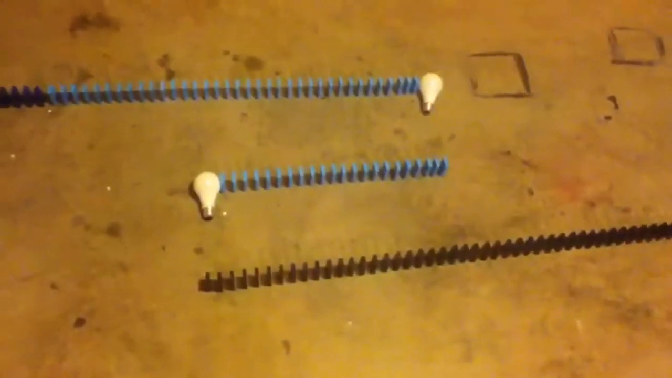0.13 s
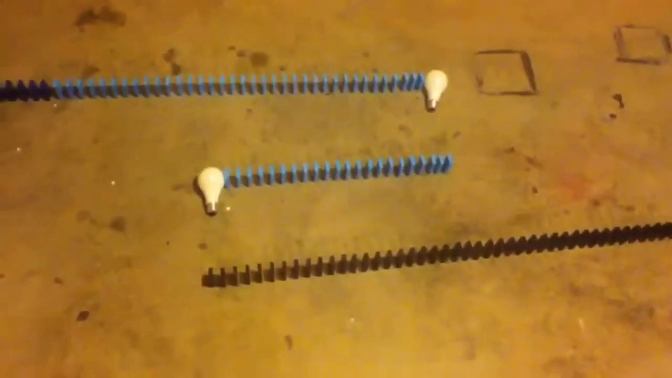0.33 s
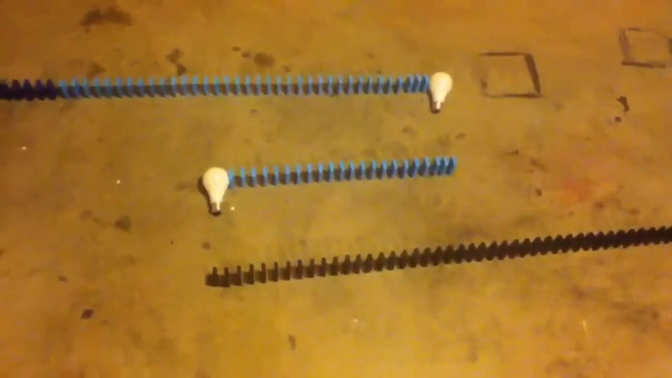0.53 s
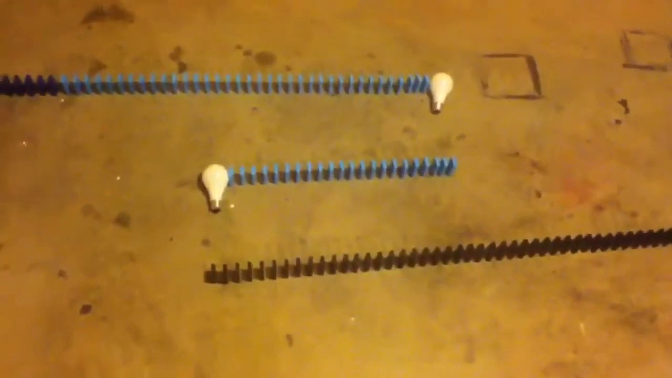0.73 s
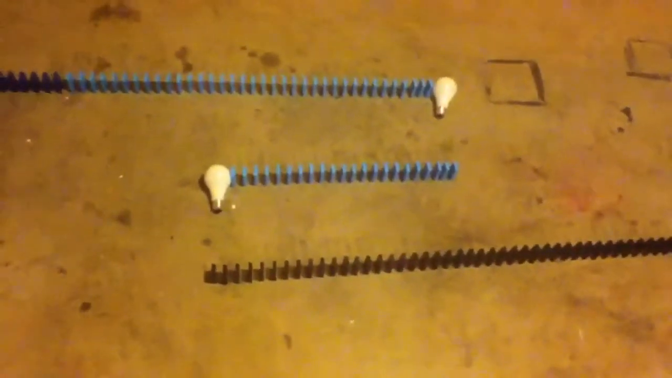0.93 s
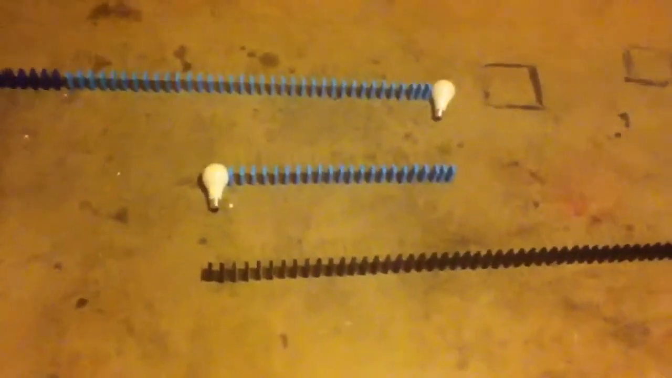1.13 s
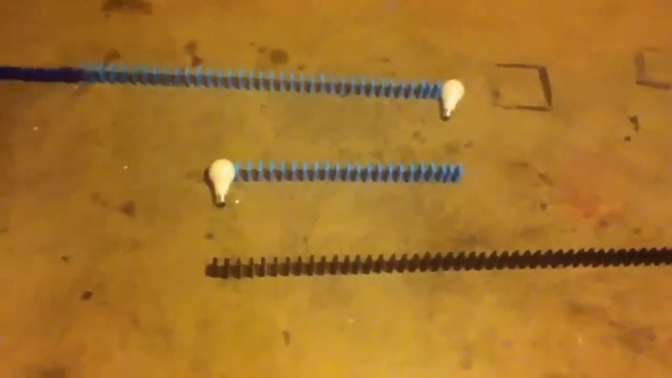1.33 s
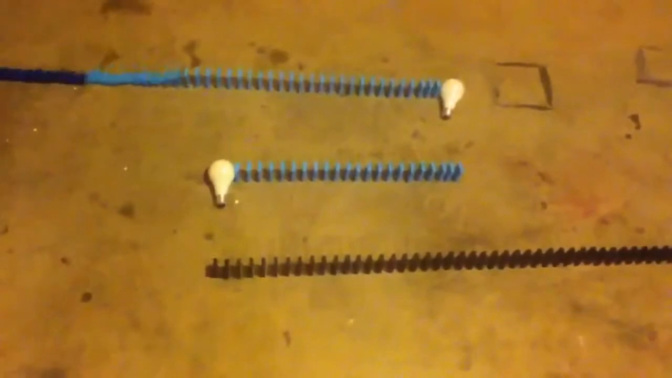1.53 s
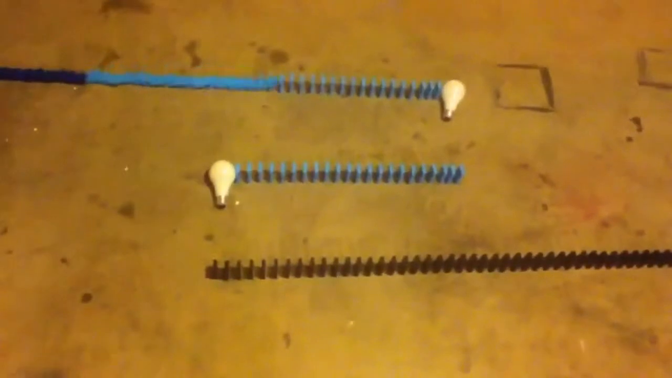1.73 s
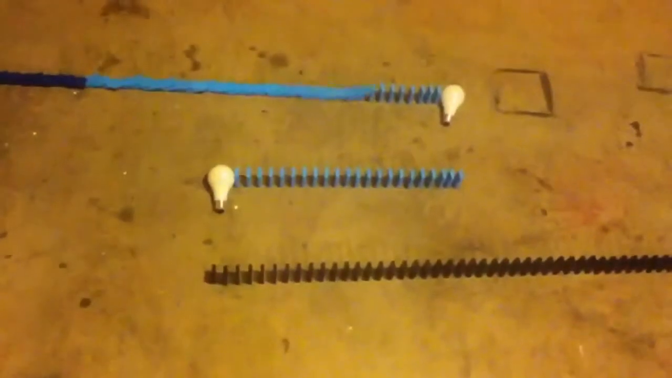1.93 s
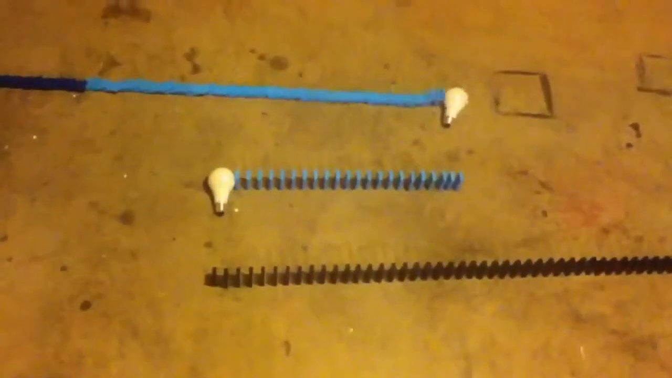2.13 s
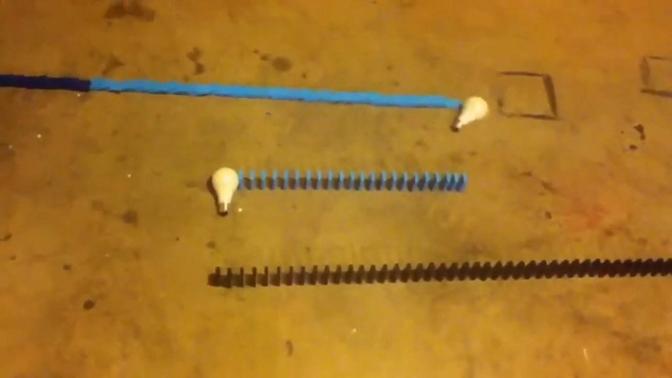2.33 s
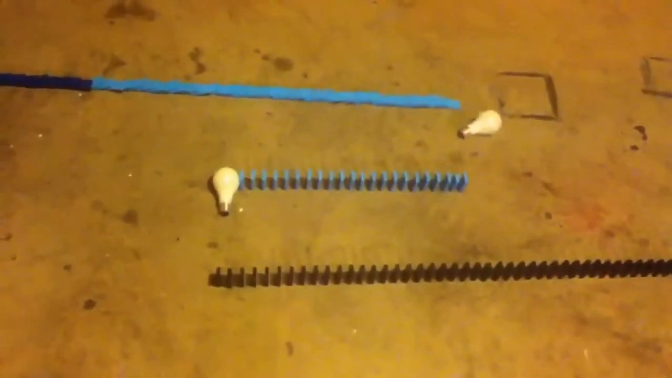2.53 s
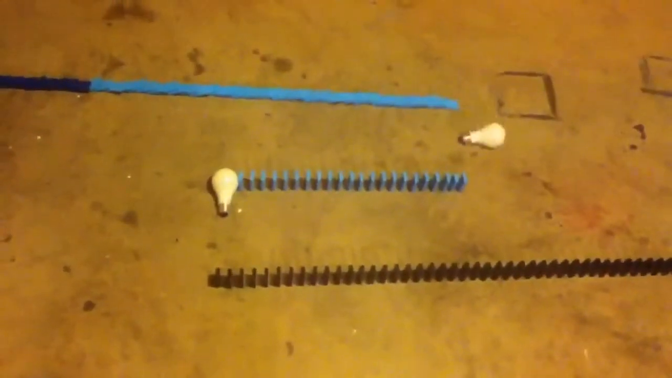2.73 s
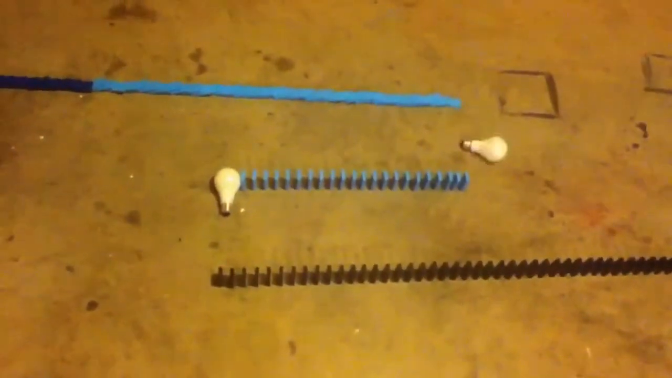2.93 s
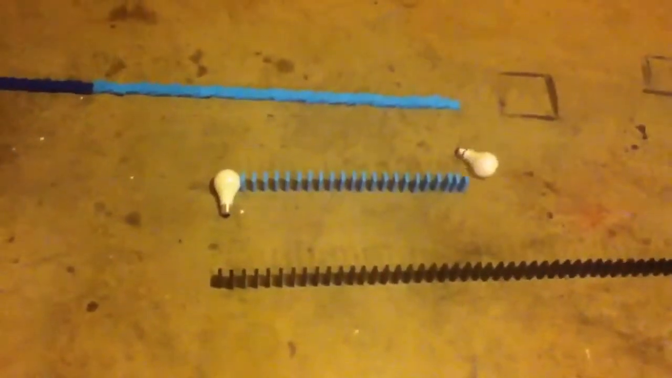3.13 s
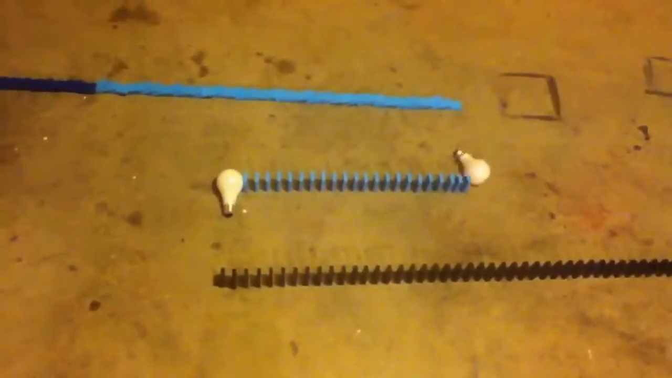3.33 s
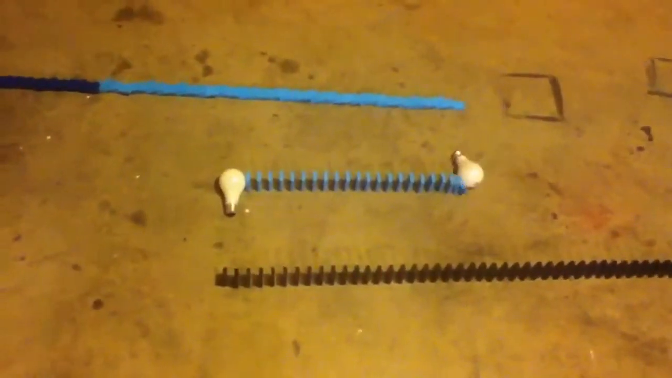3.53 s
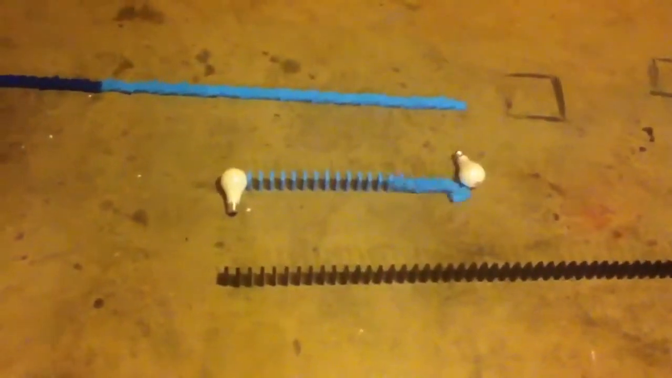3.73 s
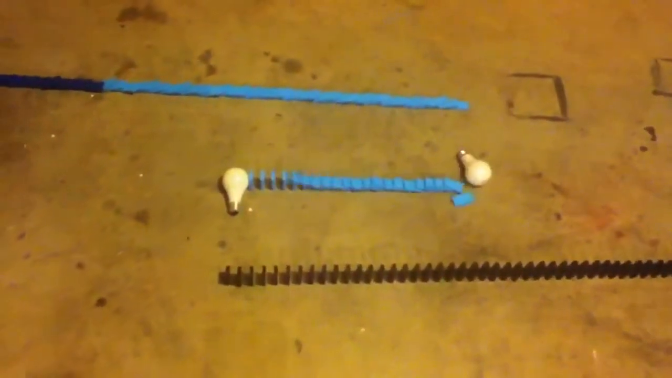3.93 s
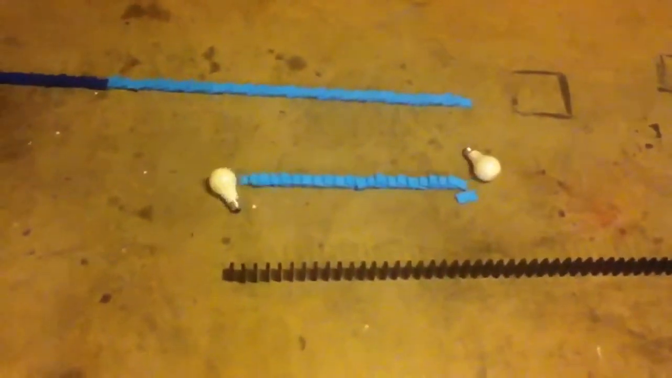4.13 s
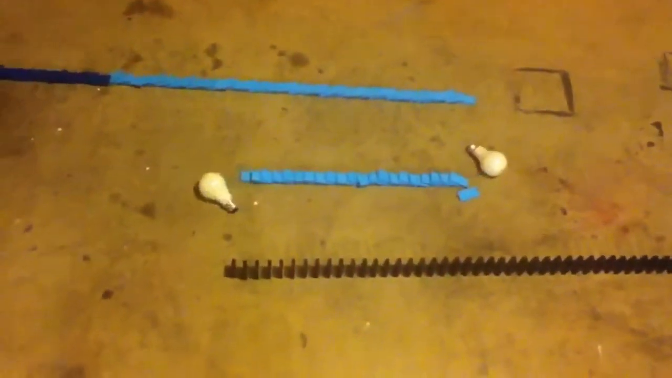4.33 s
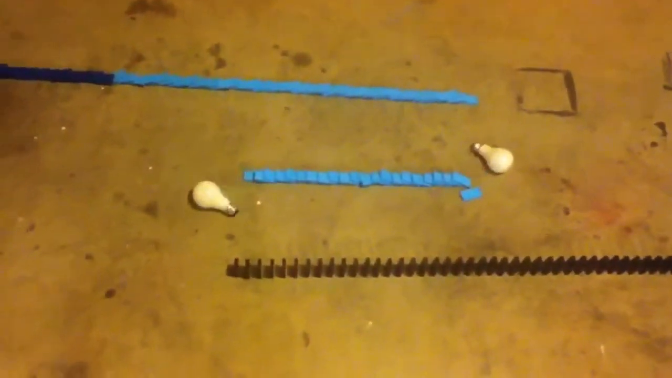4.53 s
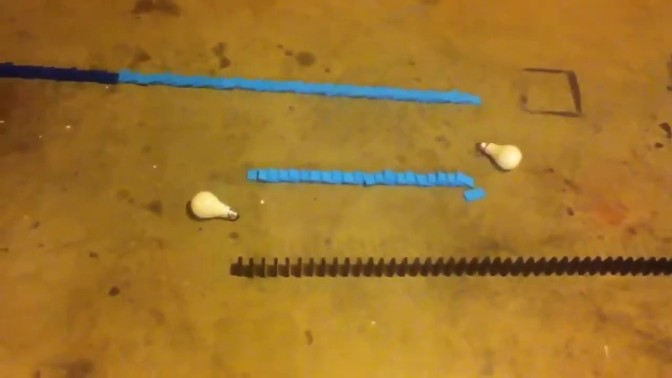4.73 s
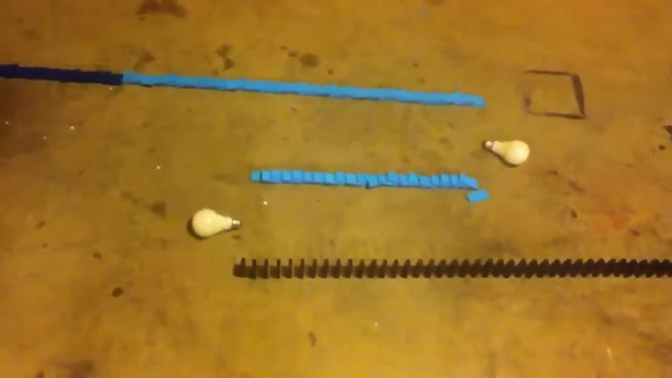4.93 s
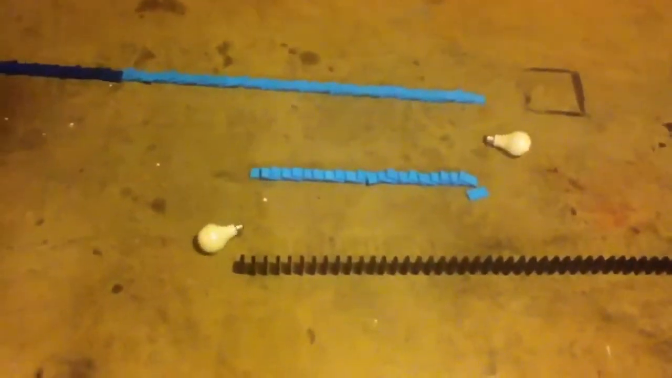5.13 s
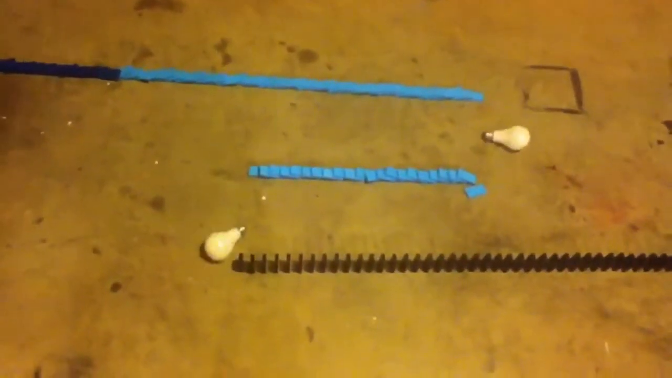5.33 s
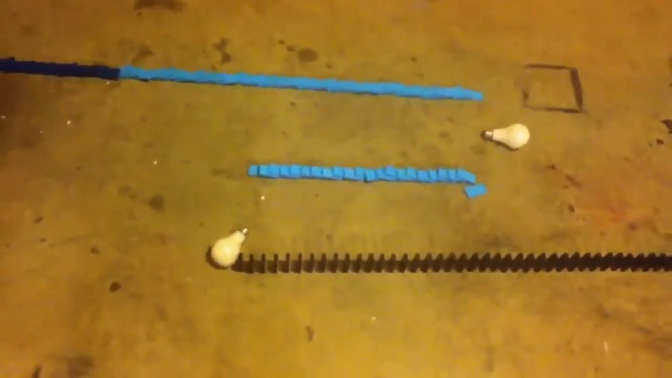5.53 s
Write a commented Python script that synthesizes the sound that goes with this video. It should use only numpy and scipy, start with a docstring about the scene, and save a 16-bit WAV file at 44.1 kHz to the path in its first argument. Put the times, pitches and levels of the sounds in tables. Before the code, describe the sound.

Soft fan hum lies under everything. Domino tiles click slowly, then rattle down a hard floor for about two seconds, crisp and dense, ending in a loud flat clap. A hollow glass bulb clinks, rolls with a thin ring and taps lightly. A second, half-second clatter follows, with another clap and glass clink, then quiet low rolling and faint ticking. Reverberant indoor room, mono, with strong wall reflections around the close clicks.

```python
"""Two rows of plastic dominoes topple on a hard floor in an echoing room with a humming fan.
The first row knocks over a light bulb, which rolls round and starts the second row;
that one knocks over another bulb, which rolls away ticking.
Tiles are coloured noise bursts with short modal rings; bulbs are dull pulses and ringing glass modes.
The fan is coloured noise with wavering tones; echoes come from decaying noise."""
import sys
import numpy as np
from scipy import signal
from scipy.fft import rfft, irfft
from scipy.io import wavfile
from scipy.ndimage import uniform_filter1d

SR = 44100
rng = np.random.default_rng(int(sys.argv[2]) if len(sys.argv) > 2 else 0)


def log_audio(samples):
    """Write samples as a 16-bit WAV file to the path given in sys.argv[1]."""
    # one column per channel
    frames = np.atleast_2d(samples).T
    # limit to full scale, then quantise
    limited = np.clip(frames, -1, 1)
    pcm = np.round(limited * 32767).astype(np.int16)
    wavfile.write(sys.argv[1], SR, pcm)


N = 250488
TIME = np.arange(N) / SR
HIT_TIME = TIME[:2048]

# Colour of a tile contact: f/Hz, relative level/dB
CRACK_COLOUR = [(50, -38), (300, -17), (700, -38.5), (1300, -12.5), (2200, -3), (4000, 4), (6500, 3.5),
                (8300, 2.5), (10500, -5.5), (13000, -6.5), (15500, -28)]
# Running rows: t/s, relative level/dB, nominal main-ring pitch of the tiles f/Hz
LONG_ROW_COURSE = [(0.78, -23.5, 5032), (1.48, -20.5, 5042), (1.57, -21, 5140), (1.63, -22, 5150),
                   (1.84, -20.5, 5180), (1.94, -23.5, 4870), (2.05, -20, 5045), (2.27, -20, 5104)]
SHORT_ROW_COURSE = [(3.885, -23.5, 5107), (4.0, -21.5, 5170), (4.08, -19.5, 4774), (4.18, -19, 5170)]


def undb(db):
    """Decibels to gain."""
    return 10 ** (np.asarray(db) / 20)


def unit(x):
    """Scale to rms 1."""
    return x / np.sqrt(np.mean(x ** 2))


def decay(t, t60_s):
    """Exponential decay by 60 dB in t60_s."""
    return np.exp(-np.log(1000) * t / t60_s)


def curve(rows, t, axis=1):
    """One column of a table of (t/s, ..) rows, read at the times t."""
    rows = np.array(rows)
    return np.interp(t, rows[:, 0], rows[:, axis])


def over_pitch(points, hz):
    """Read (f/Hz, value) points on a log-frequency axis."""
    f, value = np.transpose(points)
    return np.interp(np.log(np.maximum(hz, 1)), np.log(f), value)


def wander(count=50):
    """Random curve: straight lines through count evenly spaced unit-normal points."""
    return np.interp(TIME, np.linspace(0, TIME[-1], count), rng.standard_normal(count))


def noise(points):
    """Steady noise of the given colour, rms 1."""
    spectrum = rfft(rng.standard_normal(N))
    gain = undb(over_pitch(points, np.fft.rfftfreq(N, 1 / SR)))
    return unit(irfft(spectrum * gain, N))


def snap(points, tilt_db_per_octave):
    """Minimum-phase pulse of the given colour, tilted about 1 kHz: its energy comes earliest."""
    n = len(HIT_TIME)
    hz = np.fft.rfftfreq(n, 1 / SR)
    level_db = over_pitch(points, hz) + tilt_db_per_octave * np.log2(1 + hz / 1000)
    cepstrum = irfft(np.log(undb(level_db)))
    return irfft(np.exp(rfft(2 * cepstrum[:n // 2], n)))


def contact(points, t60_s, tilt_db_per_octave=0):
    """Hard faces chatter for a moment as they meet; energy 1."""
    chatter = rng.standard_normal(len(HIT_TIME)) * decay(HIT_TIME, t60_s)
    burst = signal.fftconvolve(chatter, snap(points, tilt_db_per_octave))[:len(HIT_TIME)]
    return burst / np.linalg.norm(burst)


def ring(modes, t, tune=1, colour_db=0):
    """Decaying sines of a struck body."""
    hz, db, t60_s = np.transpose(modes)
    sines = np.sin(2 * np.pi * np.outer(hz * tune, t))
    return undb(db + colour_db) @ (sines * decay(t, t60_s[:, None]))


def add(out, start_s, sound):
    """Mix a sound in at start_s."""
    i = int(np.clip(start_s * SR, 0, N - 1))
    out[i:i + len(sound)] += sound[:N - i]


def fan(tones_db=-2, waver=1.0, unsteady=0.00648, air_db=-46.5):
    """Soft rush of air with hum tones that waver in level and follow the unsteady speed."""
    # f/Hz, relative level per Hz/dB
    air_colour = [(15, -58), (25, -23.5), (108, -6), (145, -10), (185, 1), (223, -7.5), (256, -5),
                  (427, -11.5), (463, -11.5), (545, -16), (754, -12), (1160, -19), (1700, -27), (2500, -27),
                  (3150, -25.5), (3820, -30.5), (16000, -35.5)]
    # nominal f/Hz, relative level/dB
    hum_tones = [(118.4, -60), (172.3, -57.5), (199.2, -52.5), (247.6, -61.5), (366.1, -54.5),
                 (468.3, -59.5), (581.4, -63.5), (742.9, -65.5)]
    turning_s = np.cumsum(1 + unsteady * wander(count=200)) / SR
    hum = 0
    for hz, db in hum_tones:
        swell = 1 + waver * (wander() + 1j * wander())
        tone = np.exp(2j * np.pi * (hz * turning_s + rng.random()))
        hum = hum + undb(db + tones_db) * np.real(swell * tone)
    return hum + noise(air_colour) * undb(air_db)


def tile_ring(s, tilt_db_per_octave, detune, colour_db):
    """Short ring of one tile, its modes varied at random; upward tilt favours the high modes."""
    # bending modes: nominal f/Hz, relative level/dB, t60/s
    bending_modes = [(4940, -20, 0.16), (5130, 3.5, 0.038), (7400, -42, 0.013), (11760, -9.5, 0.036),
                     (12850, -10.5, 0.023)]
    hz = np.array(bending_modes)[:, 0]
    own_tune, own_colour = rng.standard_normal((2, len(hz)))
    main_hz = curve(np.vstack([LONG_ROW_COURSE, SHORT_ROW_COURSE]), s, axis=2)
    tune = main_hz / hz[1] * (1 + detune * own_tune)
    mode_db = colour_db * own_colour + tilt_db_per_octave * np.log2(hz / hz[1])
    return ring(bending_modes, HIT_TIME, tune, mode_db)


def single_tiles(hits, gain_db, ring_db, tilt_db_per_octave):
    """Tiles heard one by one: a crack and a short ring."""
    out = np.zeros(N)
    for s, db in hits:
        crack = contact(CRACK_COLOUR, 0.015, tilt_db_per_octave)
        body = undb(ring_db) * tile_ring(s, tilt_db_per_octave, detune=0.0073, colour_db=-0.5)
        add(out, s, undb(db + gain_db) * (crack + body))
    return out


def gathering_speed(start_s, first_gap_s, keep, full_db, count=7):
    """First tiles of a row as (t/s, dB): gaps shrink to a steady pace; blows harden with speed and weight."""
    full_speed_gap_s, db_per_speed_doubling = 0.026, 7
    db_per_leaning_tile = 1.57  # weight builds up behind the front
    tile = np.arange(count)
    gaps_s = full_speed_gap_s + (first_gap_s - full_speed_gap_s) * keep ** tile
    speed_db = db_per_speed_doubling * np.log2(full_speed_gap_s / gaps_s)
    weight_db = db_per_leaning_tile * (tile - tile[-1])
    times_s = start_s + np.cumsum(gaps_s) - gaps_s
    return np.column_stack([times_s, full_db + speed_db + weight_db])


def starting_tiles():
    """Each row starts slowly, so its first contacts stand apart."""
    # first contact t/s, first gap/s, share of extra gap kept per tile, relative level once under way/dB
    row_starts = [(0.4892, 0.109, 0.41, -10.5), (3.7125, 0.044, 0.3, -5)]
    hits = np.vstack([gathering_speed(*start) for start in row_starts])
    return single_tiles(hits, gain_db=7.0, ring_db=-17, tilt_db_per_octave=0.5)


def running_row(row, count, scatter_db=4, gain_db=-4.0, ring_db=-18, tilt_spread_db=2):
    """The falling front strikes tile after tile while those behind it bounce and settle."""
    start_s, end_s = row[0][0], row[-1][0]
    span_s = end_s - start_s
    times_s = start_s + span_s * (np.arange(count) + rng.uniform(-1, 1, count)) / count
    sizes = undb(scatter_db * np.clip(rng.standard_normal(count), -2, 2))
    sizes = sizes / np.sqrt(uniform_filter1d(sizes ** 2, size=9))
    tilts = tilt_spread_db * rng.standard_normal(count)
    out = np.zeros(N)
    for s, size, tilt in zip(times_s, sizes, tilts):
        body = undb(ring_db) * tile_ring(s, tilt, detune=0.0301, colour_db=3.0)
        click = contact(CRACK_COLOUR, 0.018, tilt) + body
        # energy for this contact's share of the row's time
        share = np.sqrt(SR * span_s / count) / np.linalg.norm(click)
        add(out, s, click * share * size * undb(curve(row, s) + gain_db))
    return out


def hard_blows():
    """The hardest blows of single tiles stand out as bright cracks."""
    # t/s, relative level/dB
    blow_hits = [(0.9024, -8), (1.3558, -14.5), (1.4396, -1.5), (1.5299, -1.5), (1.7094, -0.5),
                 (2.2054, -2), (2.4049, -8.5), (2.4658, -6), (3.923, -1.5), (3.9834, 5), (4.0302, -3),
                 (4.1224, 1), (4.1694, -1), (4.2464, -5)]
    return single_tiles(blow_hits, gain_db=1.0, ring_db=-19.5, tilt_db_per_octave=3)


def spells(rows):
    """Gain that holds through each spell of rolling and fades on either side."""
    fade_db_per_s = 64
    gain = np.zeros(N)
    for start_s, end_s, db in rows:
        outside_s = np.abs(TIME - np.clip(TIME, start_s, end_s))
        gain += undb(db - fade_db_per_s * outside_s)
    return gain


def bulb(hits, glass, singing, knock_db=13, swell_s=0.0023, hardening=0.51, firm_db=-25):
    """A bulb's knocks and, apart from them, its shell's ring, struck or kept singing by grit as it rolls."""
    # dull knock: f/Hz, relative level/dB
    knock_colour = [(50, -32), (200, -12), (550, -8.5), (1000, -0.5), (1500, 1.5), (2200, 2), (3500, -7),
                    (5000, -12.5), (8000, -24), (15000, -41)]
    t = TIME[:SR // 2]
    shell = ring(glass, t) * (1 - np.exp(-t / swell_s))
    grit = rng.standard_normal(N)
    knocks = np.zeros(N)
    rings = unit(signal.fftconvolve(grit, shell)[:N]) * spells(singing)
    for s, db, ring_db in hits:
        # a gentle knock stays in contact longer and so is duller
        pulse = snap(knock_colour, hardening * (db - firm_db))
        add(knocks, s, undb(db + knock_db) * pulse / np.linalg.norm(pulse))
        add(rings, s, undb(ring_db) * shell)
    return np.array([knocks, rings])


def first_bulb():
    """The first bulb knocks on floor and tiles, and its glass rings as it rolls."""
    # glass knocks: t/s, relative knock level/dB, relative ring level/dB
    bulb_hits = [(2.255, -22.5, -15.5), (2.267, -13, -41), (2.294, -33, -11.5), (2.325, -24, -9.5),
                 (3.361, -25.5, -25), (3.381, -29, -22.5), (3.476, -23.5, -30), (3.549, -27.5, -34.5),
                 (3.631, -39, -31), (3.713, -35.5, -28.5), (3.758, -26, -25.5), (3.790, -29.5, -20.5)]
    # shell modes: f/Hz, relative level/dB, t60/s
    shell_modes = [(2406, 0, .15), (2462, -17, .12), (6180, -21, .12), (6218, -17.5, .14), (8242, -26, .14),
                   (11170, -35, .13)]
    # rolling spells: from t/s, to t/s, level/dB
    singing_spells = [(2.3, 2.579, -58.5), (2.98, 3.2, -73), (3.364, 3.75, -61)]
    return bulb(bulb_hits, shell_modes, singing_spells)


def slaps(ring_db=-23):
    """With nothing left to lean on, the last tile of each row claps flat on the floor and rings freely."""
    # slaps and bounce: t/s, relative level/dB, brightness/(dB per octave)
    slap_hits = [(2.4193, 7.5, 6.5), (2.4236, -13, 22), (4.272, 7, 0)]
    # air clap under a flat tile: f/Hz, relative level/dB
    clap_colour = [(100, -79), (1000, -15), (2700, -7.5), (5000, 3), (8000, 0.5), (12000, -5), (16000, -15)]
    out = np.zeros(N)
    for s, db, tilt in slap_hits:
        body = undb(ring_db) * tile_ring(s, tilt, detune=0.0012, colour_db=2)
        add(out, s, undb(db) * (contact(clap_colour, 0.008, tilt) + body))
    return out


def second_bulb():
    """The second bulb knocks and rings, then ticks on its screw cap as it rolls away."""
    # glass knocks: t/s, relative knock level/dB, relative ring level/dB
    bulb_hits = [(4.169, -33, -11), (4.181, -14.5, -38), (4.196, -24, -14.5), (4.272, -21.5, -19.5),
                 (4.983, -38, -49), (5.667, -35, -29)]
    # shell modes: f/Hz, relative level/dB, t60/s
    shell_modes = [(2613, -2.5, 0.31), (2645, -9, 0.13), (5720, -13.5, 0.2), (8200, -28, .1)]
    # rolling spells: from t/s, to t/s, level/dB
    singing_spells = [(4.88, 5.55, -71)]
    return bulb(bulb_hits + cap_ticks(), shell_modes, singing_spells)


def rumble(waver_db=2.0):
    """The rolling second bulb sets the floor rumbling, a little unevenly."""
    # f/Hz, relative level/dB
    rumble_colour = [(100, -36.5), (220, -18), (320, 1), (420, -17.5), (700, -17), (1500, -40.5),
                     (4000, -44)]
    from_s, rise_s, roll_db = 4.2, 0.078, -49
    onset = np.clip((TIME - from_s) / rise_s, 0, 1)
    return noise(rumble_colour) * onset * undb(roll_db + waver_db * wander())


def cap_ticks(count=6, scatter_db=2):
    """Light, uneven knocks of a screw cap rolling over the floor as (t/s, knock dB, ring dB)."""
    from_s, to_s, tick_db, ring_db = 5.03, 5.35, -37.5, -49.5
    times_s = from_s + (to_s - from_s) * (np.arange(count) + rng.random(count)) / count
    scatter = scatter_db * rng.standard_normal(count)
    return [(s, tick_db + db, ring_db + db) for s, db in zip(times_s, scatter)]


def room_response(build_s=0.00053, first_s=0.0014):
    """Dense wall echoes of energy 1; each pitch has its own decay, longest in the middle range."""
    # reverberation: f/Hz, t60/s
    room_decay = [(200, 0.11), (1200, 0.47), (2500, 0.56), (5000, 0.48), (8000, 0.46), (15000, 0.2)]
    hz, frames_s, cells = signal.stft(rng.standard_normal(SR), SR, nperseg=256)
    fading = cells * decay(frames_s, over_pitch(room_decay, hz)[:, None])
    tail = signal.istft(fading, SR)[1][:SR]
    tail = tail * (1 - np.exp(-np.maximum(TIME[:SR] - first_s, 0) / build_s))
    return tail / np.linalg.norm(tail)


def room(sound, count=16):
    """The sound travels across the floor, so the wall-echo pattern changes from block to block."""
    out, step = np.zeros(N), N // count + 1
    for i in range(0, N, step):
        add(out, i / SR, signal.fftconvolve(sound[i:i + step], room_response()))
    return out


def scene(wet_db=1, first_wet_db=3, slap_wet_db=0, knock_wet_db=3, glass_wet_db=-10):
    """Tiles and bulbs sound into the room over the fan."""
    first = starting_tiles()
    rows = running_row(LONG_ROW_COURSE, count=240) + running_row(SHORT_ROW_COURSE, count=46)
    tiles = rows + hard_blows()
    knocks, rings = first_bulb() + second_bulb()
    claps = slaps()
    tile_send = undb(wet_db) * tiles + undb(first_wet_db) * first + undb(slap_wet_db) * claps
    echoes = room(tile_send + undb(knock_wet_db) * knocks)
    glass_echoes = undb(glass_wet_db) * signal.fftconvolve(rings, room_response())[:N]
    direct = first + tiles + claps + knocks + rings
    return (direct + echoes + glass_echoes + rumble() + fan())[None]


def record(dry, mic_hz=14800, top_hz=16100):
    """The microphone rolls off the highest treble and the recorder cuts the rest."""
    mic = signal.butter(2, mic_hz, fs=SR, output="sos")
    cut = signal.ellip(10, 0.2, 80, top_hz, fs=SR, output="sos")
    return signal.sosfilt(cut, signal.sosfilt(mic, dry))


dry = scene()
out = record(dry)
log_audio(out)
```